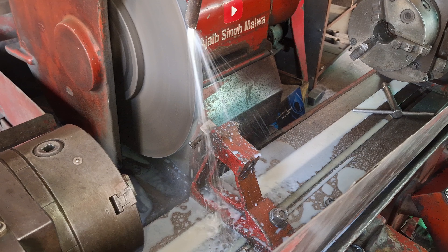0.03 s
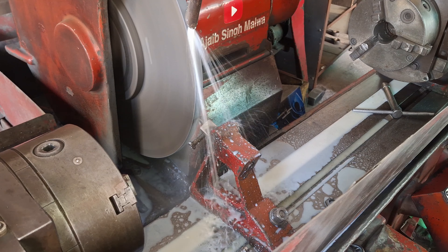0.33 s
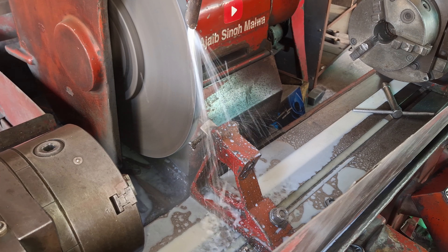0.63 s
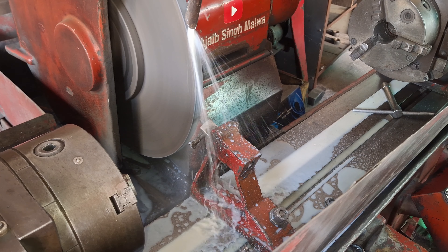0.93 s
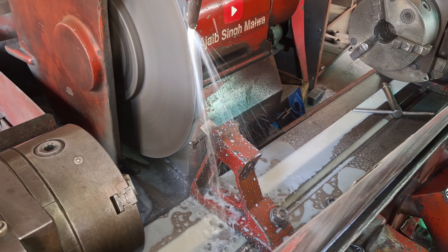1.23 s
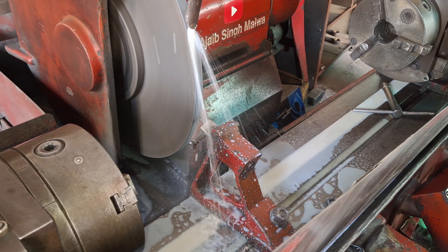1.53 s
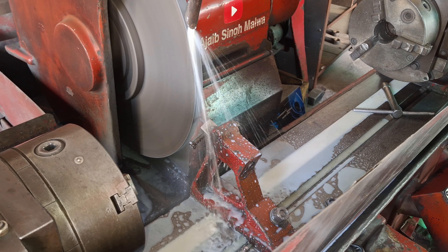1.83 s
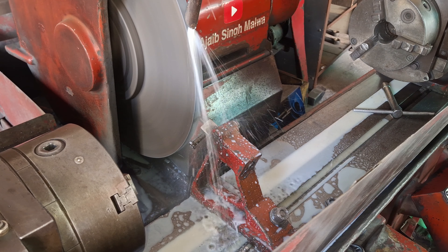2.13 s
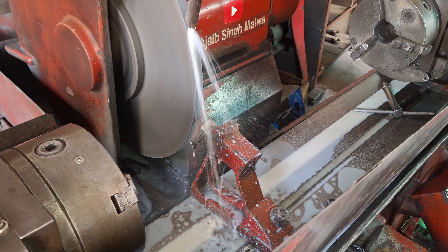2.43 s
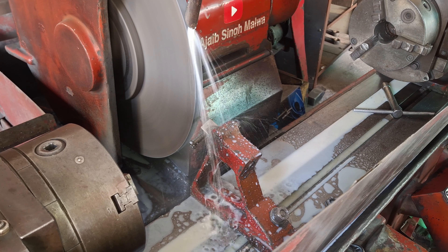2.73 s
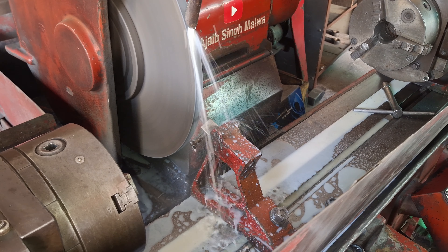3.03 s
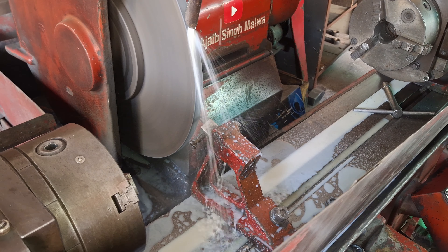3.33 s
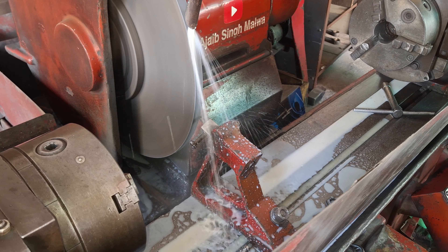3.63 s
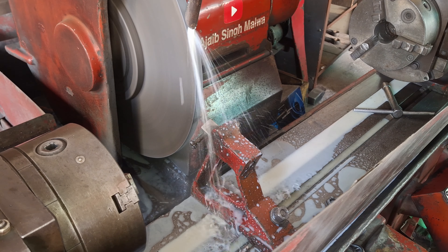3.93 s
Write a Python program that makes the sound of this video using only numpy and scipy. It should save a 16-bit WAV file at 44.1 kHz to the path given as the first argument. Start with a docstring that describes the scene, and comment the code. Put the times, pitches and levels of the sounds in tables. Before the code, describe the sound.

A grinding wheel rasps on steel over machine throb and coolant spray, then eases off.

```python
"""A cylindrical grinder works a steel shaft under a coolant jet, close by in a workshop.
From the start the wheel's grit rasps, much the same on every turn, and sets the steel ringing;
the frame throbs and thuds over the drive's rumble and the spray. Six clacks fall in the first 0.7 s.
Near 3 s the wheel comes off the work, leaving spray, rumble, weaker throbs and a thin whine.
At 3.65 s a small steel part clinks once."""
import sys
import numpy as np
from scipy import signal
from scipy.fft import rfft, irfft, next_fast_len
from scipy.io import wavfile
from scipy.ndimage import map_coordinates

SR = 44100
rng = np.random.default_rng(int(sys.argv[2]) if len(sys.argv) > 2 else 0)


def master(y):
    """Save y as 16-bit WAV."""
    cut = np.clip(np.atleast_2d(y).T, -1, 1)
    pcm = np.round(cut * 32767)  # scale
    wavfile.write(sys.argv[1], SR, pcm.astype(np.int16))


N = 176400
TIME_S, FREQ_HZ = np.arange(N) / SR, np.fft.rfftfreq(N, 1 / SR)
SIDES = np.array([[.5], [-.5]])  # left, right
WHEEL_HZ = 15.437


def amp(db):
    return 10 ** (np.asarray(db) / 20)


def unit_rms(x):
    return x / np.sqrt(np.mean(x ** 2) + 1e-20)


def at_hz(points, hz=FREQ_HZ):
    """Table value on a log frequency axis."""
    points_hz, values = np.transpose(points)
    return np.interp(np.log(hz + 1), np.log(points_hz + 1), values)


def curves(rows):
    """One value per sample for each column after the time."""
    times_s, *columns = np.transpose(rows)
    return [np.interp(TIME_S, times_s, column) for column in columns]


def wobble(knots_per_s):
    """Smooth random curve, rms near 1."""
    coarse_s = TIME_S[::64]
    knots = rng.standard_normal(1024)
    return np.interp(TIME_S, coarse_s, map_coordinates(knots, [coarse_s * knots_per_s], mode="wrap"))


def pan(db):
    """Left and right gains for a level difference."""
    return amp(SIDES * db)


# Phase between the ears (frequency [Hz], left lead [rad])
EAR_PHASE = [(30, -0.41), (55, -0.78), (80, -0.34), (140, -0.68), (220, -0.027)]
def ear_phase():
    """The bass reaches the right ear first."""
    return np.exp(1j * SIDES * at_hz(EAR_PHASE))


# Likeness of the ears (frequency [Hz], correlation [1])
EAR_CORRELATION = [(30, 0.9), (60, 0.97), (120, 1), (290, 0.74), (640, 0.48), (1410, 0), (3100, 0.14),
                   (15000, 0.35)]
def stereo_noise(gain, balance_db):
    """Shaped noise, rms 1: bass alike in both ears, treble diffuse."""
    angle = np.arccos(at_hz(EAR_CORRELATION)) / 2
    mid, side = rfft(rng.standard_normal((2, N))) * gain * [np.cos(angle), np.sin(angle)]
    ears = np.array([mid + side, mid - side])
    return unit_rms(irfft(ears * pan(balance_db) * ear_phase(), N))


# Machine's stereo balance (frequency [Hz], left minus right [dB])
BALANCE = [(60, -0.5), (110, 2.5), (200, -2), (380, 0.5), (700, 1.5), (1290, -2), (2380, 0.5), (4400, 0),
           (8120, 3), (15000, 2.5)]
def machine_noise(spectrum):
    """Coloured noise from the machine's direction, rms 1."""
    return stereo_noise(amp(at_hz(spectrum)), at_hz(BALANCE))


# Scrape repeating each turn (frequency [Hz], power share [1])
REPEAT_SHARE = [(600, .75), (1000, .8), (2000, .65), (4000, .45), (7000, .35), (12000, .2)]
def grit_spectrum(face_kept=.94):
    """The same slowly wearing wheel face passes each turn, mixed with fresh chips."""
    turn_samples = round(SR / WHEEL_HZ)
    wear = rng.standard_normal((N // turn_samples + 1, turn_samples))
    wear[1:] *= np.sqrt(1 - face_kept ** 2)
    face = signal.lfilter([1], [1, -face_kept], wear, axis=0).ravel()[:N]
    share = at_hz(REPEAT_SHARE)
    return np.sqrt(share) * rfft(face) + np.sqrt(1 - share) * rfft(rng.standard_normal(N))


def resonance(grit, mode_hz, width_hz):
    """One grit-fed mode, rms 1, out of step at the two ears."""
    shape = (1 + (2 * (FREQ_HZ - mode_hz) / width_hz) ** 2) ** -.7
    quarter_cycle = np.exp(.5j * np.pi * np.array([[0], [rng.choice([-1, 1])]]))
    return unit_rms(irfft(grit * shape * quarter_cycle * pan(at_hz(BALANCE, mode_hz)), N))


# Rasp spectrum (frequency [Hz], relative density [dB])
RASP_SPECTRUM = [(300, -19), (560, -6), (660, -3), (750, -11), (960, 1), (1080, -4), (1300, -14),
                 (1470, -2.5), (1780, -11), (2050, -6), (2500, -4.5), (3100, -13), (3600, -5.5), (4200, -4),
                 (4850, -1), (5550, -9.5), (5950, -1), (6400, -13.5), (6750, -26), (7200, -2), (7800, -15),
                 (8550, -4), (9000, -5.5), (10000, -2), (12000, -17), (16000, -60)]
def scrape(grit, bed_t60_s=.16, bed_share=.75, grain_db=.24):
    """Grit scrapes, mostly heard through the dense weak modes of bed and guards."""
    response = rfft(rng.standard_normal((2, N)) * amp(-60 * TIME_S / bed_t60_s))
    colour = amp(at_hz(RASP_SPECTRUM)) * pan(at_hz(BALANCE))
    bed = np.sqrt(bed_share) * unit_rms(irfft(grit * response * colour, N))
    direct = np.sqrt(1 - bed_share) * machine_noise(RASP_SPECTRUM)
    return (bed + direct) * amp(grain_db * wobble(230))


# Guard modes (frequency [Hz], width [Hz], relative level [dB])
GUARD_MODES = [(660, 32, -1.5), (938, 34, 1), (974, 32, .5), (2030, 49, -7), (2240, 60, -6),
               (2995, 35, -11)]
def guard_ring(grit):
    """The cut drives the guard's low resonances."""
    return unit_rms(sum(amp(db) * resonance(grit, hz, width_hz) for hz, width_hz, db in GUARD_MODES))


# Shaft and wheel modes (frequency [Hz], relative level [dB])
STEEL_MODES = [(1389, -55.5), (1960, -57), (2810, -56), (3688, -56.5), (5943, -59), (6885, -50),
               (7197, -53), (8096, -57), (8683, -54), (9173, -54), (9916, -53), (11073, -46), (11693, -46),
               (12123, -51), (12559, -53), (12893, -47), (13011, -49), (13065, -46), (13329, -52),
               (13561, -54), (14034, -52), (14659, -46), (14906, -45), (15558, -56)]
# Swells of nearby modes (frequency [Hz], peak time [s], half length [s], boost [dB])
MODE_SWELLS = [(1400, 1.6, 0.35, 6.5), (2810, 2.55, .45, 6), (3690, 1.6, .4, 3), (14800, 1.52, 0.4, 5),
               (13200, 1.93, 0.33, 3), (6885, 2.78, 0.4, 3), (11080, .55, 0.72, 5), (13000, 0.25, 0.81, 2),
               (11900, 1.5, 0.84, 2)]
def steel_ring(grit, wander_db=.4):
    """Steel modes ring, some driven harder as the contact moves along."""
    out = np.zeros((2, N))
    for hz, db in STEEL_MODES:
        swell_db = sum(boost_db * np.exp(-((TIME_S - peak_s) / half_s) ** 2)
                       for near_hz, peak_s, half_s, boost_db in MODE_SWELLS if abs(near_hz / hz - 1) < .03)
        level = amp(db + swell_db + wander_db * wobble(2.4))
        out += level * resonance(grit, hz, width_hz=11 + .002 * hz)
    return unit_rms(out)


def cut_strength(level_db, idle_db):
    """Amplitude of what rises above the free-running level."""
    return np.sqrt(np.maximum(amp(level_db) ** 2 - amp(idle_db) ** 2, 0))


# Course of the cut (time [s], relative rasp level [dB], relative sizzle level [dB])
CUT_LEVELS = [(0.22, -35, -31.5), (0.28, -33, -30), (0.31, -31, -27), (0.39, -35.5, -30),
              (0.45, -32, -28.5), (0.48, -35, -28.5), (0.65, -31, -26), (0.99, -35, -29), (1.57, -32, -26),
              (2.19, -33.5, -27), (2.69, -32, -24), (2.94, -33, -25), (3.35, -41.5, -36), (4.0, -50, -39.5)]
# Sizzle spectrum (frequency [Hz], relative density [dB])
SIZZLE_SPECTRUM = [(7500, -40), (9000, -9), (10500, -4), (11300, 0), (12100, -6), (13100, -1), (13900, -3),
                   (14500, 0), (15000, 5), (15200, 0), (15700, 2)]
def grinding(runout_db=.45, lobe_db=.5, unrest_db=.55):
    """Grit rasps on the shaft, pulsing with the wheel's turn, and keeps steel and guard ringing."""
    rasp_db, sizzle_db = curves(CUT_LEVELS)
    rasp, sizzle = cut_strength(rasp_db, idle_db=-44.5), cut_strength(sizzle_db, idle_db=-38.5)
    angle = 2 * np.pi * WHEEL_HZ * TIME_S
    pressure = amp(runout_db * np.sin(angle) + lobe_db * np.sin(2 * angle) + unrest_db * wobble(20))
    grit = grit_spectrum()
    body = amp(3.5) * scrape(grit) + amp(-5.5) * guard_ring(grit)
    treble = amp(-2.3) * machine_noise(SIZZLE_SPECTRUM) + steel_ring(grit)
    return pressure * (rasp * body + sizzle * treble)


# Frame throbs (start [s], length [s], relative level [dB])
FRAME_THROBS = [(-0.015, 0.053, -11.5), (0.067, 0.088, -12.5), (0.179, 0.091, -11.5), (0.301, 0.085, -11.5),
                (0.432, 0.083, -12), (0.553, 0.077, -14), (0.693, 0.08, -13), (0.808, 0.094, -15),
                (0.956, 0.032, -24), (1.003, 0.047, -23), (1.053, 0.08, -16.5), (1.177, 0.088, -18.5),
                (1.3, 0.076, -17), (1.435, 0.14, -19), (1.587, 0.072, -17.5), (1.676, 0.086, -18.5),
                (1.816, 0.065, -19), (1.917, 0.12, -19), (2.085, 0.054, -18.5), (2.202, 0.044, -20),
                (2.31, 0.041, -20.5), (2.385, 0.066, -20.5), (2.467, 0.15, -21), (2.67, 0.082, -22),
                (2.796, 0.037, -20), (2.87, 0.128, -23.5), (3.022, 0.045, -24), (3.126, 0.07, -21.5),
                (3.265, 0.076, -23.5), (3.396, 0.019, -20), (3.519, 0.041, -21.5), (3.65, 0.031, -21),
                (3.765, 0.034, -20.5), (3.884, 0.058, -19.5)]
# Drone under the throbs (time [s], level [dB])
DRONE_LEVEL = [(0, -27), (1, -36), (1.4, -27), (2.0, -26), (2.6, -25.5), (2.9, -44), (4, -37)]
# Frame hum (time [s], pitch [Hz])
FRAME_PITCH = [(0, 117.3), (1, 117), (2, 118.2), (2.55, 119.4), (2.8, 109.6), (3.3, 110.9), (4, 110.4)]
# Housing shake spectrum (frequency [Hz], relative density [dB])
SHAKE_SPECTRUM = [(20, -11), (40, 3), (56, 1), (70, 16.5), (82, 9), (96, 7), (118, 0), (130, 17),
                  (145, 8.5), (210, -10.5), (300, -20), (550, -58), (1500, -70)]
def frame_hum(rise_s=.022, fall_s=.017, sag_db_per_s=30, dip_hz=11, dip_s=.026, flutter_hz=22.5):
    """The frame's low resonance swells in throbs, each starting flat; strong ones shake the housing."""
    throb_power, dip = np.zeros(N), np.zeros(N)
    for start_s, length_s, db in FRAME_THROBS:
        age_s = np.maximum(TIME_S - start_s, 0)
        rise = np.sin(np.pi / 2 * np.minimum(age_s / rise_s, 1))
        fall = np.exp(-np.maximum(age_s - length_s, 0) / fall_s)
        throb_power += (amp(db - sag_db_per_s * age_s) * rise * fall) ** 2
        dip += (age_s > 0) * np.exp(-(age_s / dip_s) ** 2)
    drone_db, = curves(DRONE_LEVEL)
    level = np.sqrt(throb_power + amp(drone_db) ** 2)
    base_hz, = curves(FRAME_PITCH)
    pitch_hz = base_hz - dip_hz * dip + 1.2 * wobble(35.17)
    phase = 2 * np.pi * np.cumsum(pitch_hz) / SR
    flutter = amp(1.2 * np.sin(2 * np.pi * flutter_hz * TIME_S + wobble(7.3)) + .5 * wobble(28.53))
    fundamental = level * np.sqrt(2) * np.sin(phase) * flutter
    lowpass = signal.butter(10, 127.4, fs=SR, output="sos")
    fundamental = signal.sosfiltfilt(lowpass, np.pad(fundamental, N // 8))[N // 8:][:N]
    octave = amp(drone_db - 15.5) * np.sqrt(2) * np.sin(2 * phase) * flutter
    hum = amp(.2) * irfft(rfft(fundamental + octave) * ear_phase(), N) * pan(2.2)
    shake = amp(-4.5) * level ** 1.6 * machine_noise(SHAKE_SPECTRUM)
    return hum + shake


# Thud spectrum (frequency [Hz], relative density [dB])
THUD_SPECTRUM = [(90, -24), (165, 1), (210, 1), (300, -8), (400, -9), (500, -24), (900, -50)]
def frame_thuds(attack_s=.003, t60_s=.36, growth=1.6):
    """Each throb starts with a dull thud; hard ones thud much more."""
    level = np.zeros(N)
    for start_s, _, db in FRAME_THROBS:
        age_s = np.maximum(TIME_S - start_s, 0)
        level += amp(growth * db - 60 * age_s / t60_s) * (1 - np.exp(-age_s / attack_s))
    return amp(-4.5) * level * machine_noise(THUD_SPECTRUM)


# Course of the rumble (time [s], level [dB])
RUMBLE_COURSE = [(0, -31.5), (1, -32), (1.5, -34.5), (2.2, -29.5), (3, -28.5), (4, -28)]
# Rumble spectrum (frequency [Hz], relative density [dB])
RUMBLE_SPECTRUM = [(20, -20), (40, 0), (60, -12), (80, 1), (98, 12), (120, -5), (130, 7.5), (145, 0.5),
                   (185, -2), (230, -1), (252, -5.5), (285, -1), (325, -10.5), (420, -9.5), (560, -10),
                   (750, -13), (900, -11), (1050, -22.5), (1400, -18), (2200, -22.5), (4000, -25.5),
                   (9000, -40)]
def drive_rumble(runout_db=.5, lobe_db=.06, unrest_db=1):
    """Motors and belts rumble, pulsing with the wheel."""
    angle = 2 * np.pi * WHEEL_HZ * TIME_S
    level_db, = curves(RUMBLE_COURSE)
    pulse_db = runout_db * np.sin(angle) + lobe_db * np.sin(2 * angle) + unrest_db * wobble(24.99)
    return amp(level_db + pulse_db) * machine_noise(RUMBLE_SPECTRUM)


# Motor and pump tones (frequency [Hz], relative level [dB])
MOTOR_TONES = [(59.5, -37), (275, -43.5), (300, -47.5), (398, -53.5), (694, -67), (866.7, -40),
               (893.6, -46)]
def drive_tones(gain_db=-3, drift_hz=.92, waver_db=3, whine_above_hz=800, unload_s=2.8, fade_s=.14):
    """Motors and pump sound unsteady tones; the whine is weaker while the wheel is loaded."""
    load = (1 - np.tanh((TIME_S - unload_s) / fade_s)) / 2
    out = np.zeros((2, N))
    for hz, db in MOTOR_TONES:
        phase = 2 * np.pi * np.cumsum(hz + drift_hz * wobble(10)) / SR
        spread = SIDES * np.arccos(at_hz(EAR_CORRELATION, hz))
        tone_db = db + gain_db + waver_db * wobble(15) - 4.5 * load * (hz > whine_above_hz)
        out += amp(tone_db) * np.sqrt(2) * np.sin(phase + spread) * pan(at_hz(BALANCE, hz))
    return out


# Spray spectrum (frequency [Hz], relative density [dB])
SPRAY_SPECTRUM = [(300, -12), (1200, -2), (2800, -15.5), (4500, -19.5), (6200, -11), (8000, -7),
                  (10200, -9), (11500, -1), (13000, -4), (14500, 3.5), (15700, -7)]
def coolant(level_db=-35.5, flow_db=2.4):
    """The jet breaks into fine spray on the wheel."""
    level = amp(level_db + flow_db * wobble(4.6))
    return level * stereo_noise(amp(at_hz(SPRAY_SPECTRUM)), balance_db=2)


# Clacks (start [s], level [dB], band centre [Hz])
CLACKS = [(0.073, -22.5, 3460), (0.188, -24.5, 3700), (0.31, -32, 3470), (.4379, -26, 6900),
          (0.562, -28, 4330), (.69, -30, 3500)]
def clacks(attack_s=.00051, t60_s=.11, half_width_oct=.95):
    """Dry clacks with the first hard throbs."""
    out = np.zeros((2, N))
    for start_s, db, centre_hz in CLACKS:
        age_s = np.maximum(TIME_S - start_s, 0)
        envelope = amp(db - 60 * age_s / t60_s) * (1 - np.exp(-age_s / attack_s))
        band = 1 / (1 + np.abs(np.log2((FREQ_HZ + 1) / centre_hz) / half_width_oct) ** 3)
        out += envelope * stereo_noise(band, balance_db=0)
    return out


# Small steel part's modes (frequency [Hz], relative level [dB], T60 [s])
CLINK_MODES = [(1147, -6, 0.085), (1620, 1, .03), (2065, 2, 0.043), (2150, -4, 0.17), (2290, -11, .045),
               (2880, -4, .025)]
def clink(start_s=3.652, gain_db=-32, tick_t60_s=.008):
    """A short tick, then a small steel part rings out."""
    age_s = np.maximum(TIME_S - start_s, 0)
    ring = sum(amp(db - 60 * age_s / t60_s) * np.sin(2 * np.pi * hz * age_s)
               for hz, db, t60_s in CLINK_MODES)
    tick_noise = machine_noise([(500, -20), (1300, 2), (2800, 0), (5000, -25)])
    tick = (age_s > 0) * amp(-60 * age_s / tick_t60_s) * tick_noise
    return amp(gain_db) * (ring + tick)


def scene():
    machine = grinding() + frame_hum() + frame_thuds() + drive_rumble() + drive_tones()
    return machine + coolant() + clacks() + clink()


def record(dry, top_hz=15760):
    """Brick-wall low-pass."""
    size = next_fast_len(N + SR // 2)
    passband = np.fft.rfftfreq(size, 1 / SR) < top_hz
    return irfft(rfft(dry, size) * passband, size)[:, :N]


dry = scene()
out = record(dry)
master(out)
```